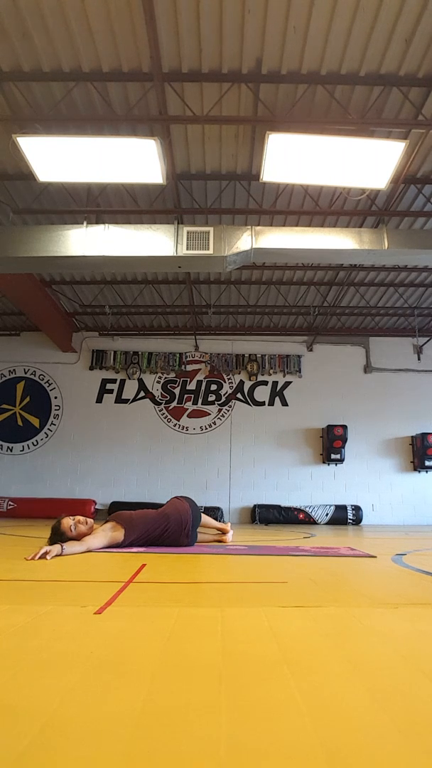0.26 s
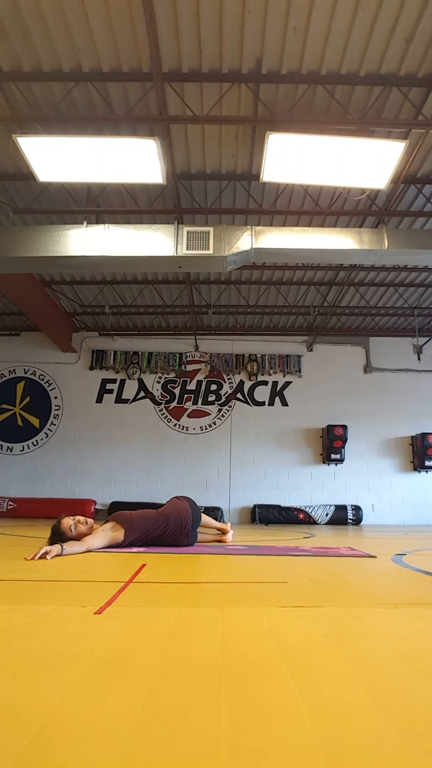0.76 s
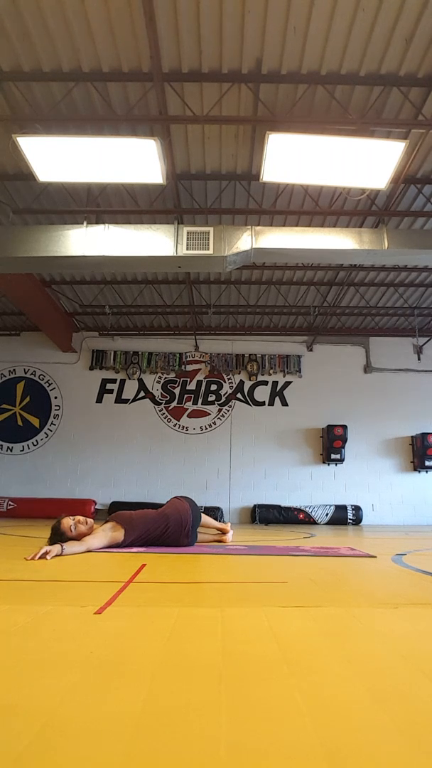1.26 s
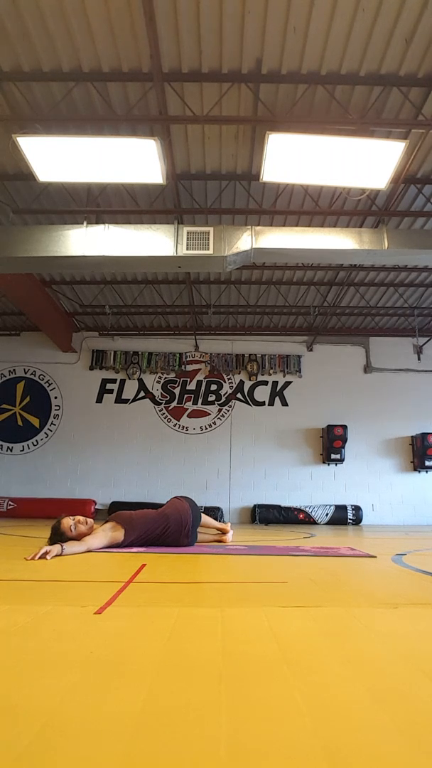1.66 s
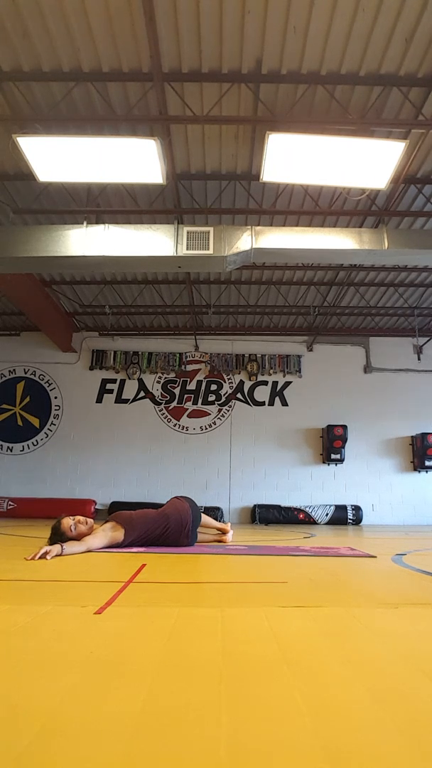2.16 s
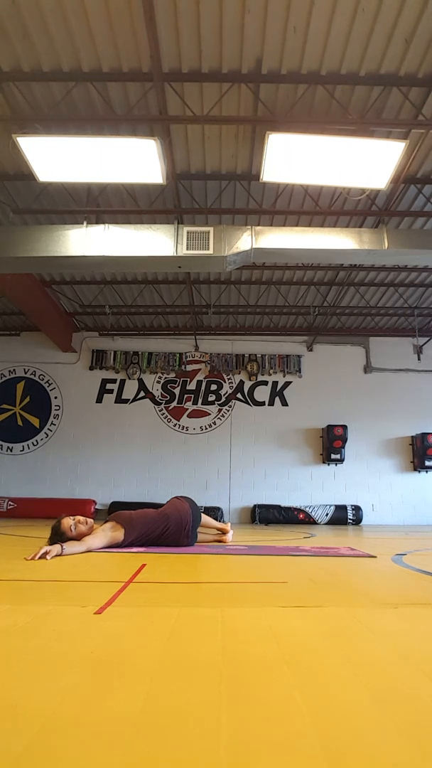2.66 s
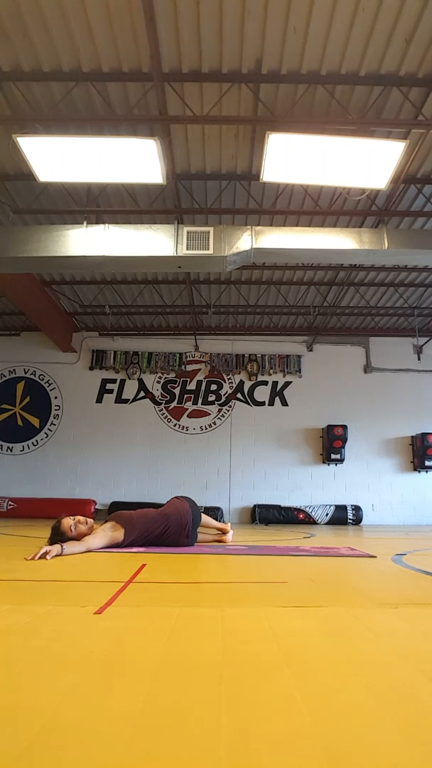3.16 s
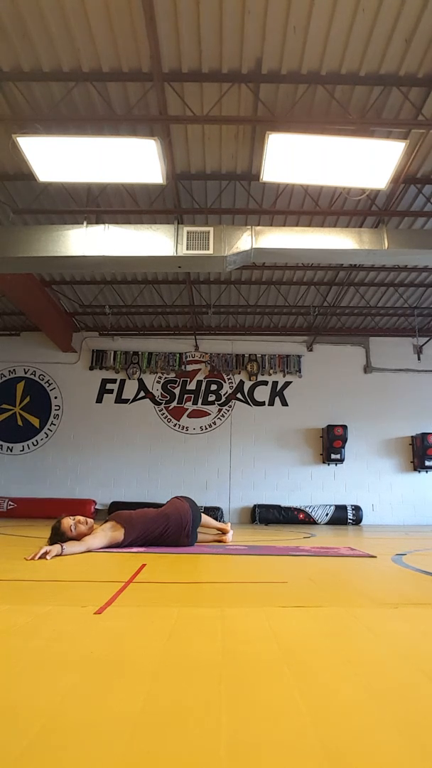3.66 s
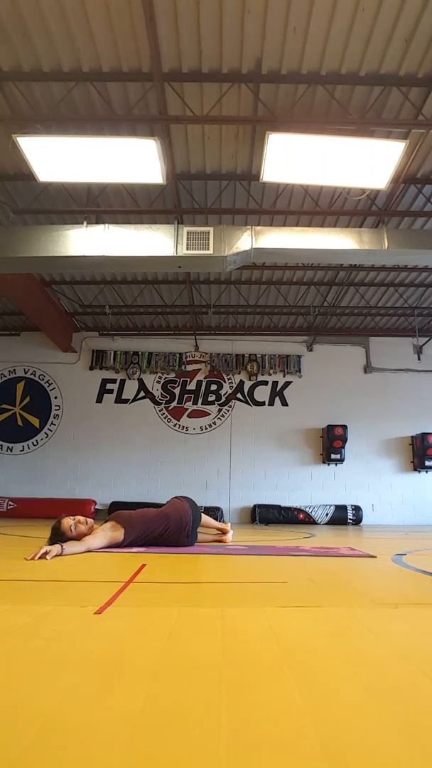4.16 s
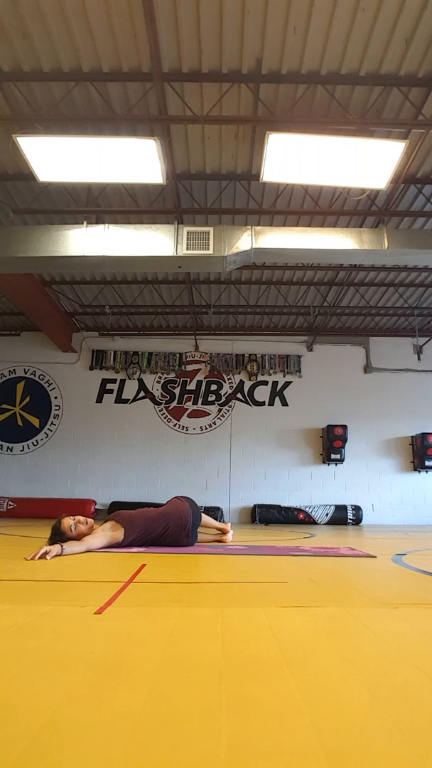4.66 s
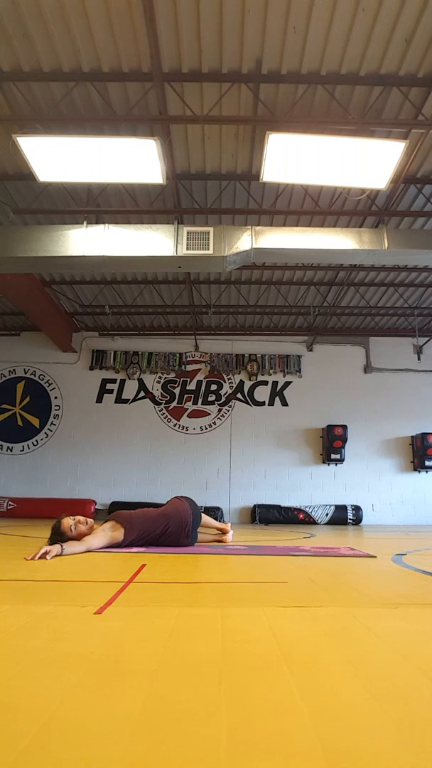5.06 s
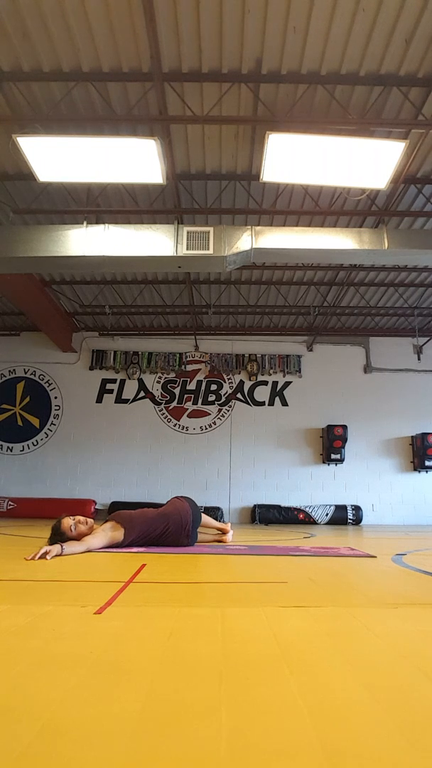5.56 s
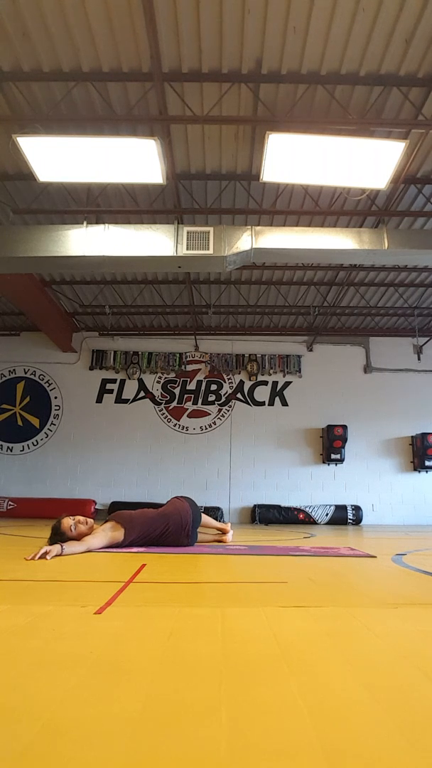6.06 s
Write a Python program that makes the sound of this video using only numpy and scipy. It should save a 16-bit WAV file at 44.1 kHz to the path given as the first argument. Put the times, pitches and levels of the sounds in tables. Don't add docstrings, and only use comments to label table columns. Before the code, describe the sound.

In a large, hard-walled sports hall, ventilation runs without a break. A deep, uneven duct rumble dominates, fluttering several times a second. Beneath it two fans make a low hum that slowly swells and sinks, joined by steady motor and mains tones. A faint, dull air hiss comes from far vents. The stereo microphone sits on the floor, far from the sources; the person lying on the mat makes no sound.

```python
import sys
import numpy as np
from scipy import signal
from scipy.fft import rfft, irfft
from scipy.io import wavfile
from scipy.ndimage import uniform_filter1d

SR = 44100
rng = np.random.default_rng(int(sys.argv[2]) if len(sys.argv) > 2 else 0)


def bounce(signal):
    frames = np.transpose(np.atleast_2d(signal))
    limited = np.clip(frames, -1, 1)
    pcm = np.round(limited * 32767).astype(np.int16)
    wavfile.write(sys.argv[1], SR, pcm)


def ratio(d):
    e = np.asarray(d, float) / 20
    return 10 ** e


N = 277830
HZ = np.fft.rfftfreq(N, 1 / SR)
T = np.arange(N) / SR


def evened(x):
    return x / np.sqrt(np.mean(x ** 2) + 1e-20)


def smoothed(x, size):
    return uniform_filter1d(uniform_filter1d(x, size=size), size=size)


def read(points, column):
    table = np.transpose(points)
    return np.interp(np.log(HZ + 1), np.log(table[0]), table[column])


def drift(top_hz):
    noise = rfft(rng.standard_normal(N))
    return evened(irfft(noise * (HZ < top_hz) * (HZ > 0), N))


# freq_hz, likeness (0 to 1), left_lead_rad, left_minus_right_db (of the rumble)
MICROPHONE_PAIR = [(25, .9, 0, 1.2), (60, .992, 0, 1.6), (120, .995, 0, 1.7), (190, .988, 0, 1.8),
                   (235, .97, 0, 2.5), (310, .95, .06, .3), (380, .72, .07, .3), (470, .57, -.1, 0),
                   (570, .6, -.16, 0), (660, .38, .2, 0), (820, .56, .4, 0), (1100, .38, .9, 0),
                   (1370, .05, 1.5, 0), (2500, .1, 3.1, 0), (5000, .02, 3.1, 0)]


def diffuse():
    left, other = rfft(rng.standard_normal((2, N))) * np.sqrt(SR / 2)
    same = np.clip(read(MICROPHONE_PAIR, 1), 0, 1)
    delayed = left * np.exp(-1j * read(MICROPHONE_PAIR, 2))
    right = same * delayed + np.sqrt(1 - same ** 2) * other
    return np.array([left, right])


# freq_hz, level_db (per Hz)
LEFT_HISS = [(300, -81), (390, -84), (560, -84), (1000, -88), (1350, -95), (1600, -93.5), (2200, -94),
             (3000, -98), (5700, -107.2), (7000, -108.8), (8700, -114.6), (10700, -118.4), (12400, -114.3),
             (15400, -114.6)]
# freq_hz, level_db (per Hz)
RIGHT_HISS = [(300, -83), (390, -83), (560, -82), (1000, -89.5), (1350, -93.5), (1800, -91.5), (3000, -94),
              (3600, -99.7), (5500, -102.5), (7000, -112.8), (7800, -112.4), (10500, -117.8),
              (12500, -113.2), (14200, -114.9)]


def hiss(ripple_db=1.7, ripple_top_hz=12000):
    ripple = np.array([evened(smoothed(r, 60)) for r in rng.standard_normal((2, len(HZ)))])
    colour_db = np.array([read(LEFT_HISS, 1), read(RIGHT_HISS, 1)])
    colour_db = colour_db + ripple_db * ripple / (1 + HZ / ripple_top_hz)
    under = 1 / np.sqrt(1 + (260 / (HZ + 1)) ** 6)
    breath = ratio(.25 * drift(5))
    return irfft(diffuse() * ratio(colour_db) * under, N) * breath


# pitch_hz, left_db, right_db, left_lead_rad
STEADY_TONES = [(120.02, -43.7, -45.3, 0.0), (221.2, -40.8, -43.9, -0.01), (240.01, -55.2, -58.2, -0.09),
                (258.84, -60.2, -65.9, 0.09), (295.88, -72.4, -72.5, 0.18), (1168.34, -79.9, -76.7, 0.93),
                (1285.16, -95.0, -83.8, -1.08), (6240.6, -103.3, -111.8, -1.63),
                (6480.64, -93.5, -107.6, 0.26), (6600.64, -97.5, -98.9, 0.5),
                (6720.64, -102.2, -105.8, -0.53)]


def tones():
    out = np.zeros((2, N))
    for hz, left_db, right_db, lead in STEADY_TONES:
        angle = 2 * np.pi * (hz * T + rng.random()) + 0.041 * drift(1.2)
        waver = np.sqrt(2) * ratio(0.24 * drift(5.3))
        left = ratio(left_db) * np.cos(angle + lead)
        right = ratio(right_db) * np.cos(angle)
        out += waver * np.array([left, right])
    return out


FAN_HZ, FAN_DB = 59.32, -41
SLOW_FAN_HZ, SLOW_FAN_DB = 58.95, -47.5
IN_STEP_S = 1.35
FAN_TILT_DB = 1.5


def fans():
    turn = 2 * np.pi * (T - IN_STEP_S)
    fast = ratio(FAN_DB + 0.83 * drift(1.5)) * np.cos(FAN_HZ * turn)
    left_lead_rad = np.array([[.08], [0]])
    slow = ratio(SLOW_FAN_DB) * np.cos(SLOW_FAN_HZ * turn + left_lead_rad)
    return np.sqrt(2) * (fast + slow) * ratio(np.array([[0], [-FAN_TILT_DB]]))


def surges(rows, half_s):
    power = 1
    for centre_s, db in rows:
        power = power + (ratio(2 * db) - 1) * np.exp(-((T - centre_s) / half_s) ** 2)
    return np.sqrt(power)


# freq_hz, width_hz,
# level_db (per Hz)
HALL_MODES = [(18, 14, -83), (27, 7, -76.5), (39, 8, -70), (50, 7, -64), (69, 6, -55.5), (82, 7, -50.5),
              (98, 7, -49), (108, 8, -54), (116, 9, -50.5), (129, 7, -54.5), (141, 8, -65.5),
              (151, 6, -56.5), (162, 9, -60), (175, 12, -60), (187, 9, -61.5), (201, 11, -65),
              (214, 7, -59.5), (232, 10, -66), (249, 12, -71.5), (265, 10, -71), (278, 12, -77),
              (294, 7, -72.5), (310, 14, -83), (356, 7, -80), (577, 10, -83), (1232, 8, -87),
              (1261, 8, -88), (1343, 8, -93), (4170, 90, -103), (12600, 2400, -121)]
# centre_s, level_db (over the lull)
MAIN_DUCT_SURGES = [(.11, 9), (.67, 5.5), (1.05, 7), (1.2, 5.5), (1.48, 1.5), (1.7, 4.5), (1.99, 7),
                    (2.36, 2.5), (2.6, 6), (2.78, 7.5), (3.03, 5.5), (3.29, 4.5), (3.53, 7.5), (3.76, 6.5),
                    (4.11, 10), (4.37, 8), (4.75, 10), (5.0, 5.5), (5.51, 9.5), (5.74, 9.5), (6.13, 8)]
# centre_s, level_db (over the lull)
BRANCH_DUCT_SURGES = [(.57, 3), (.81, 4.5), (1.24, 5.5), (1.68, 4.5), (1.82, 3.5), (2.41, 4), (2.61, 3),
                      (2.83, 6.5), (3.33, 5), (3.69, 4), (4.07, 1), (4.23, 4), (4.65, 5.5), (5.09, 5),
                      (5.43, 6.5), (5.78, 3.5), (6.0, 7.5)]
MAIN_SURGE_S, BRANCH_SURGE_S = .08, 0.075


def swell(band, surge, depth):
    own = np.sqrt(smoothed(band[0] ** 2, 4000))
    swelled = band * surge / own ** depth
    return swelled * band.std() / swelled.std()


def rumble():
    power = 0
    for hz, width_hz, db in HALL_MODES:
        power = power + ratio(2 * db) / (1 + (2 * (HZ - hz) / width_hz) ** 2) ** 2
    side_db = np.array([0 * HZ, -read(MICROPHONE_PAIR, 3)])
    field = diffuse() * np.sqrt(power) * ratio(side_db)

    def band(low_hz, high_hz):
        return irfft(field * (HZ >= low_hz) * (HZ < high_hz), N)

    steady = irfft(field * ((HZ < 65) | (HZ >= 205)), N)
    deep = swell(band(65.8, 150), surges(MAIN_DUCT_SURGES, MAIN_SURGE_S), 0.8)
    upper = swell(band(136.3, 205), surges(BRANCH_DUCT_SURGES, BRANCH_SURGE_S), 0.7)
    return steady + deep + upper


def scene():
    return hiss() + tones() + fans() + rumble()


def top_cut(x):
    return signal.sosfilt(signal.butter(12, 15880, fs=SR, output="sos"), x)


def record(dry):
    offset = dry - .00062
    mix = irfft(rfft(offset) * (HZ < 15725), N)
    return top_cut(mix)


dry = scene()
out = record(dry)
bounce(out)
```